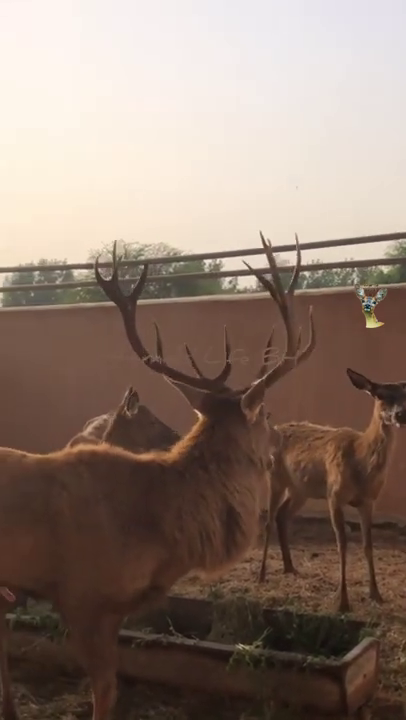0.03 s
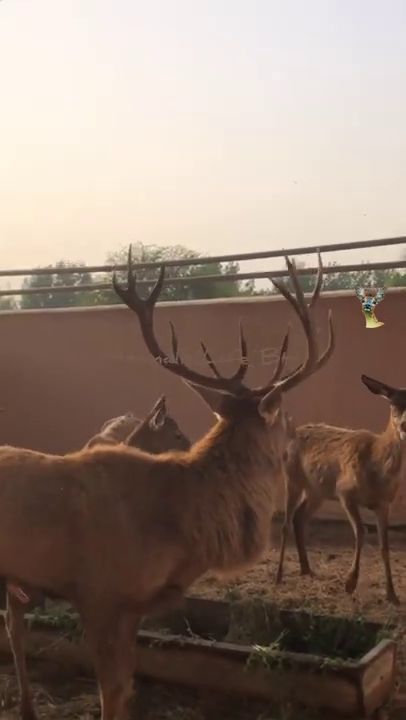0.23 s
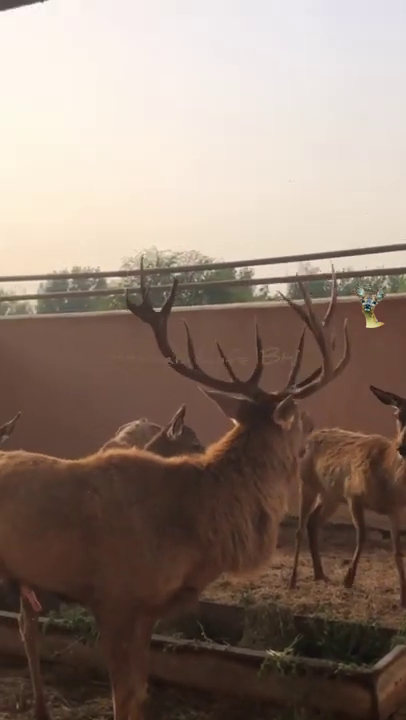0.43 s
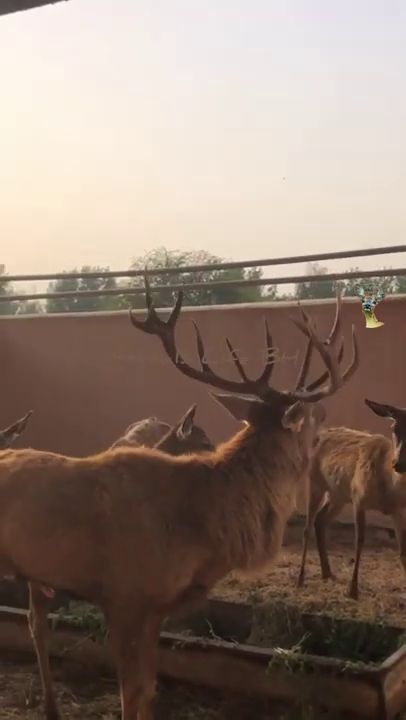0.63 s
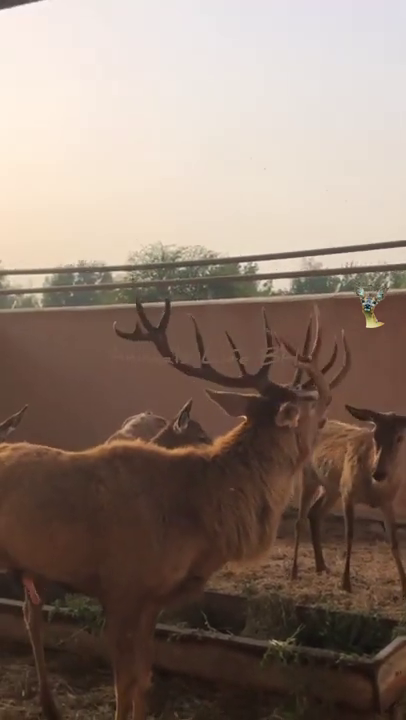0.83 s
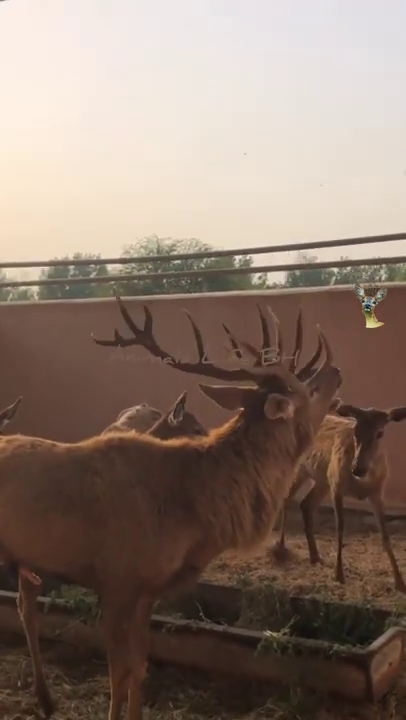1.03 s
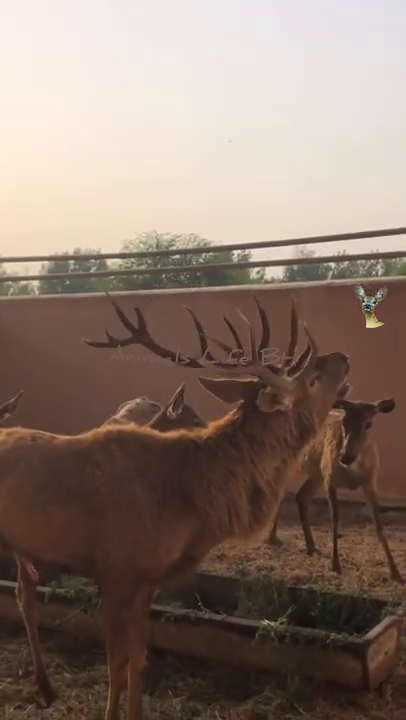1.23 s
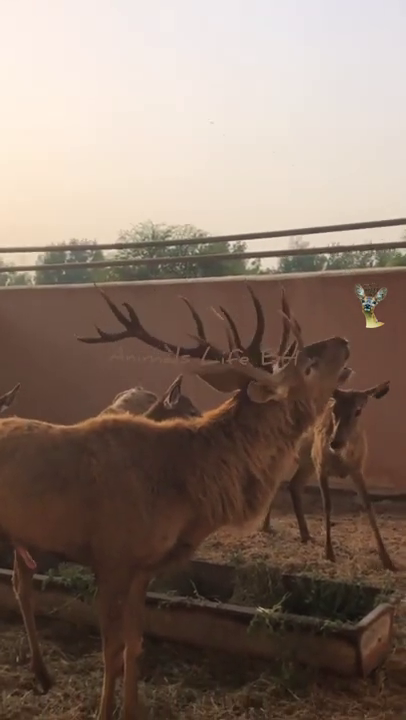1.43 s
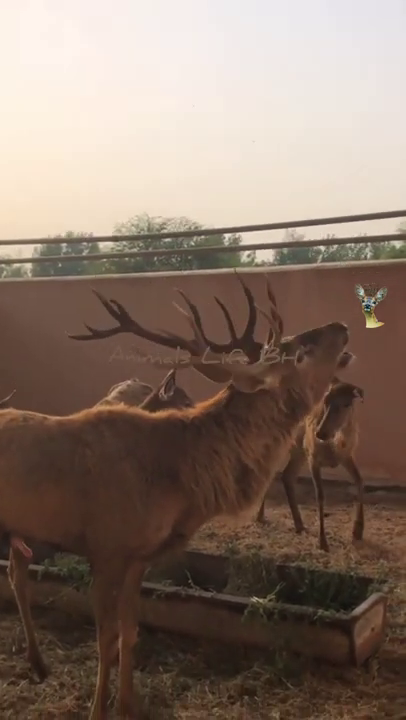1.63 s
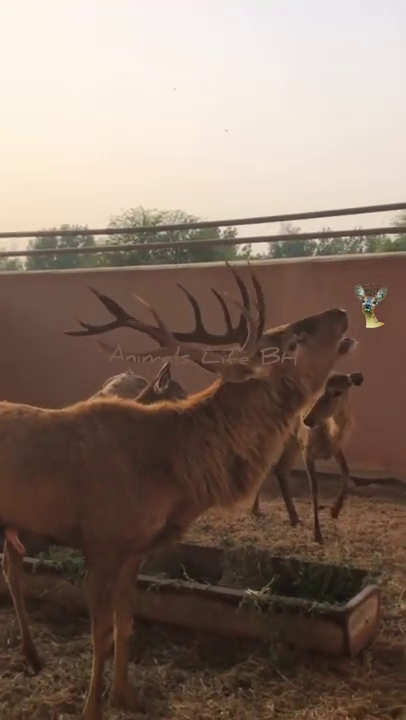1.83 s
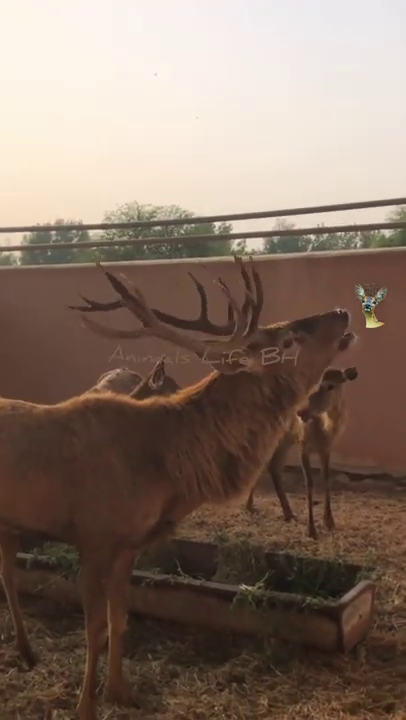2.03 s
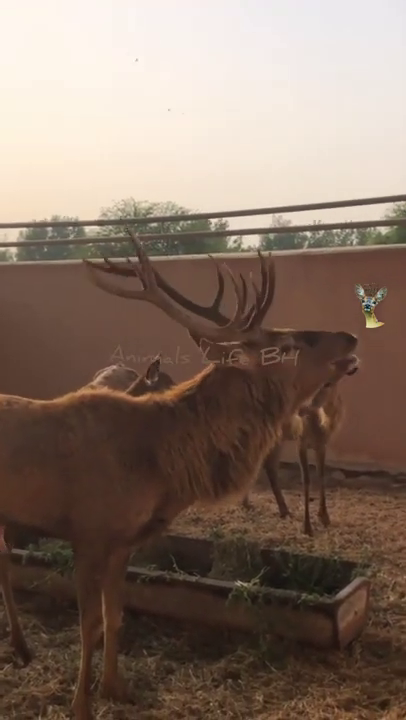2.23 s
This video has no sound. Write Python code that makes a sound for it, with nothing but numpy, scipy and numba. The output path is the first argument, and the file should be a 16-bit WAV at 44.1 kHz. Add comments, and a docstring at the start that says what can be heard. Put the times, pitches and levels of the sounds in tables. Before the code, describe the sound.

A red deer stag roars once, starting right away with a deep, rough tone and a faint breathy hiss. The roar swells, is loudest from about 1.1 to 1.7 seconds, then turns hoarse and drops in pitch, ending just after 2 seconds. The walls of the outdoor pen add a short echo, and a faint low rumble continues underneath.

```python
"""In a walled pen, over a low outdoor rumble, a red deer stag gives one long, deep roar.
His voice is a source and a filter: slow vocal-fold pulses excite the resonances of the throat, which
sink as he stretches his neck and lengthens it. The roar swells, then turns hoarse and drops in pitch.
Air hisses through his mouth, three faint ticks sound, and ground and walls reflect the roar."""
import sys
import numpy as np
from scipy import signal
from scipy.fft import rfft, irfft
from scipy.io import wavfile
from scipy.ndimage import uniform_filter1d
from numba import njit

SR = 44100
rng = np.random.default_rng(int(sys.argv[2]) if len(sys.argv) > 2 else 0)


def wav_record(signal):
    """Record a signal, one row per channel, as 16-bit PCM in the file named by sys.argv[1]."""
    frames = np.transpose(np.atleast_2d(signal))
    bounded = np.clip(frames, -1, 1)
    # unit amplitude maps onto the largest positive 16-bit level
    quanta = np.round(bounded * 32767).astype(np.int16)
    wavfile.write(sys.argv[1], SR, quanta)


N = 101429
TIME = np.arange(N) / SR


def from_db(db):
    """Amplitude ratio: tenfold for every 20 dB."""
    return 10 ** (np.asarray(db) / 20)


def rms_one(x):
    """Normalisation to unit mean power."""
    return x / np.sqrt(np.mean(x ** 2) + 1e-20)


def in_time(rows):
    """Linear interpolation of each column at every sample."""
    seconds, *columns = np.transpose(rows)
    return [np.interp(TIME, seconds, column) for column in columns]


def cut(x, hz, kind, order=2):
    """Butterworth low- or high-pass filtering."""
    return signal.sosfilt(signal.butter(order, hz, kind, fs=SR, output="sos"), x)


def wander(hz):
    """Slow random fluctuation: low-passed noise of unit rms."""
    return rms_one(cut(rng.standard_normal(N), hz, "low"))


def smoothed(x, seconds):
    """A moving average, taken twice."""
    size = int(seconds * SR)
    return uniform_filter1d(uniform_filter1d(x, size), size)


def evened(x):
    """Division by the running rms holds the level at 1 over a few pulses."""
    return x / np.sqrt(np.abs(smoothed(x * x, seconds=0.03)) + 1e-14)


def coloured(x, spectrum):
    """Spectral shaping by a curve over log frequency, scaled to unit rms."""
    hz, db = np.transpose(spectrum)
    bin_hz = np.maximum(np.arange(N // 2 + 1) * SR / N, 1)
    gain = from_db(np.interp(np.log(bin_hz), np.log(hz), db))
    return rms_one(irfft(rfft(x) * gain, N))


@njit
def resonate(x, hz, width_hz):
    """A driven, damped oscillator with a moving natural frequency and a peak gain of about 1."""
    out, state, decay = np.zeros(len(x)), 0j, np.exp(-np.pi * width_hz / SR)
    for i in range(len(x)):
        state = state * decay * np.exp(2j * np.pi * hz[i] / SR) + x[i]
        out[i] = 2 * (1 - decay) * state.real
    return out


# The outdoor noise spectrum. Each row: frequency in Hz, relative spectral density in dB.
RUMBLE_SPECTRUM = [(20, -25), (35, -8), (50, 10), (64, -6.5), (85, 0.5), (120, -9), (200, -16),
                   (400, -25.5), (700, -22.5), (1100, -25.5), (2500, -32), (5000, -39.5), (9000, -51),
                   (15000, -52.5)]

def outdoor_rumble():
    """Ambient noise: a random signal with most of its power at low frequencies."""
    return from_db(-36.5) * coloured(rng.standard_normal(N), RUMBLE_SPECTRUM)


# Faint ticks. Each row: start in seconds, level in dB, centre frequency in Hz.
TICKS = [(.105, -48, 7800), (0.173, -47.5, 5300), (2.045, -48, 6303)]

def ticks(decay_s=0.0064):
    """Transients: bright bursts of narrow-band noise that decay exponentially."""
    out = 0
    for start, db, hz in TICKS:
        band = resonate(rng.standard_normal(N), np.full(N, float(hz)), width_hz=440.0)
        envelope = (TIME >= start) * np.exp(-np.abs(TIME - start) / decay_s)
        out += from_db(db) * envelope * rms_one(cut(band, 4500, "high"))
    return out


def pen_reverberation(x, t60_s, build_s=0.027):
    """Reverberation: dense reflections between the walls merge into a decaying noise tail."""
    t = np.arange(SR) / SR
    tail = rng.standard_normal(SR) * from_db(-60 * t / t60_s) * np.clip(t / build_s, 0, 1)
    tail /= np.sqrt(np.sum(tail ** 2))
    return cut(signal.fftconvolve(x, tail)[:N], 4100, "low")


# Reflections from ground and walls. Each row: delay in seconds, gain in dB.
REFLECTIONS = [(.0031, -10.5), (.0076, -11.5), (0.0176, -3.5), (.0251, -11)]

def echoed(x):
    """Superposition: the direct sound interferes with its delayed, weaker reflections."""
    return x + sum(from_db(db) * np.interp(TIME - delay, TIME, x, left=0) for delay, db in REFLECTIONS)


# Air in the mouth. Each row: time in seconds, level in dB, centre frequency in Hz.
MOUTH_HISS = [(.05, -60, 8400), (.3, -56, 7340), (.45, -49, 7460), (.65, -48.5, 7100), (.85, -48, 6080),
              (1.03, -48.5, 6100), (1.15, -59.5, 6110), (1.6, -62.5, 6440), (2.0, -81, 7160)]

def mouth_hiss(puffs, pulsing=0.61):
    """Turbulence: a high band of noise, partly modulated in amplitude by the puffs of air."""
    db, hz = in_time(MOUTH_HISS)
    noise = (1 - pulsing + pulsing * puffs) * rng.standard_normal(N)
    band = resonate(cut(noise, 5000, "high", order=4), hz, width_hz=1500.0)
    return from_db(db) * rms_one(echoed(cut(band, 8900, "low", order=4)))


# The colour of the rasp. Each row: frequency in Hz, relative gain in dB.
RASP_SPECTRUM = [(2500, 0), (3300, 7.5), (4300, 1), (4900, -13), (6400, -14), (7600, -20.5), (8300, -8.5),
                 (8700, -18), (10500, -22.5), (11800, -18), (12600, -35), (15000, -32)]
# Its strength. Each row: time in seconds, level in dB relative to the upper resonances.
RASP_LEVEL = [(.2, -22), (.45, -16.5), (1.03, -26.5), (1.17, -17.5), (1.7, -20), (2.05, -26)]

def rasp(pulses, air):
    """Aspiration noise: pulsing air and a trace of the fold clicks reach above the resonances."""
    excitation = from_db(-27) * pulses + air
    return from_db(in_time(RASP_LEVEL)[0]) * evened(echoed(coloured(excitation, RASP_SPECTRUM)))


# The vibration rate of the folds. Each row: time in seconds, frequency in Hz.
FOLD_RATE = [(0.06, 82), (0.12, 91.22), (0.14, 93.64), (0.18, 97), (0.24, 93.44), (0.33, 82.9),
             (0.4, 82.81), (0.65, 82.61), (0.8, 78.38), (1.0, 82.8), (1.12, 90.28), (1.24, 87.42),
             (1.56, 89.21), (1.7, 88.5), (1.8, 83.95), (1.95, 69.33), (2.02, 64.66), (2.1, 62.57)]
# Their hoarseness. Each row: time in seconds, roughness from 0 to 1.
HOARSENESS = [(.05, 0.48), (.28, 0.38), (.38, 0.2), (.68, 0.12), (.78, 0.27), (.9, .15), (1.05, 0.24),
              (1.25, 0.21), (1.45, 0.11), (1.64, 0.14), (1.74, 0.49), (2.05, 0.7)]

def fold_motion(wobble_cycles=0.038, wobble_hz=25.4):
    """Phase is the integral of frequency; hoarseness adds a random wobble to the count of cycles."""
    pitch, rough = in_time(FOLD_RATE)[0], in_time(HOARSENESS)[0]
    cycles = np.cumsum(pitch) / SR + wobble_cycles * rough ** 2 * wander(wobble_hz)
    return pitch, rough, np.maximum.accumulate(cycles)


def fold_pulses(cycles, rough, scatter, jitter_s, shimmer_db=1.5):
    """Jitter and shimmer: each closure is a click whose time and strength scatter with hoarseness."""
    closures = np.interp(np.arange(1, int(cycles[-1])), cycles, np.arange(N))
    timing, strength = rough[closures.astype(int)] * scatter[:len(closures)].T
    closures = np.clip(closures + jitter_s * SR * timing, 0, N - 2)
    size = from_db(shimmer_db * strength)
    out, whole, fraction = np.zeros(N), closures.astype(int), closures % 1
    out[whole] += size * (1 - fraction)
    out[whole + 1] += size * fraction
    return rms_one(out)


# The lengthening throat. Each row: time in seconds, stretch (0 short, 1 half stretched, 2 long).
THROAT_STRETCH = [(.1, 1.09), (.27, 0.85), (.36, 0.4), (.55, 0.4), (.7, 0.75), (.87, 0.86), (1.03, 1.21),
                  (1.25, 1.793), (1.45, 1.905), (1.6, 1.87), (2.0, 2.03)]

def by_stretch(values):
    """Interpolation between the short, half stretched and long throat as the neck moves."""
    return np.interp(in_time(THROAT_STRETCH)[0], np.arange(3), values)


def throat(source, formants, skirt_ratio=4.72):
    """Formants: parallel resonances of the throat's air column, most sinking as it lengthens."""
    out = 0
    for row in formants:
        hz, db, width_hz = by_stretch(row[:3]), by_stretch(row[3:6]), float(row[6])
        peak = resonate(source, hz, width_hz)
        out += from_db(db) * resonate(peak, hz, width_hz * skirt_ratio)  # steepens the flanks
    return out


# The upper throat resonances. Each row: three frequencies in Hz (short, half stretched and long
# throat), three relative gains in dB for the same, bandwidth in Hz.
UPPER_FORMANTS = [(1226, 950, 890, -1.5, -3, 1, 29.4), (1252, 1135, 1130, 1.5, -5, -1, 44.7),
                  (1679, 1425, 1240, -2, -6.5, -3, 16.7), (2114, 1700, 1625, 4.5, -15, -9, 101),
                  (2350, 1990, 1890, -0.5, -5, -9.5, 55), (3090, 2400, 2230, -4.5, -13, -14.5, 48),
                  (3047, 2726, 2800, -0.5, -18.5, -18.5, 70), (3348, 3270, 3050, -13, -21.5, -14, 29)]

def upper_resonances(pulses, air):
    """Impulse response: each fold click rings in the upper formants, along with the noise of air."""
    voiced = throat(pulses + from_db(5.5) * air, UPPER_FORMANTS)
    voiced = cut(voiced, 3610, "low", order=8)
    return evened(echoed(cut(voiced, 842, "high", order=4)))


# The low throat resonances. Each row: three frequencies in Hz (short, half stretched and long
# throat), three relative gains in dB for the same, bandwidth in Hz.
GROWL_FORMANTS = [(242, 258, 156, 1, -11, 3, 72), (353, 329, 350, 2.5, -4, 13.5, 31),
                  (575, 570, 650, -12, -14.5, -14.5, 105)]

def growl(pulses, air):
    """Forced vibration: uneven pulses and a little air drive the low formants."""
    voiced = throat(pulses + from_db(-14) * air, GROWL_FORMANTS)
    voiced = cut(voiced, 675, "low", order=4)
    return evened(cut(voiced, 102, "high"))


# The throat's response to the lowest harmonics. Each row: frequency in Hz, then relative gain in dB
# for the short, half stretched and long throat.
DEEP_RESPONSE = [(70.4, -12, -7, -2), (94, -11.5, -8.5, -20), (135, -14, -12, -8), (160, -12.5, -12, -10.5),
                 (240, -3.5, -10, -9.5), (333, -6.5, 0, 0.5), (362.2, -7, 4.5, 0.5), (408.4, -4, -18, -28),
                 (431, -14, -19.5, -19.5), (521, -3.5, -16, -15), (519.2, -12.5, -24, 2),
                 (602, -5.5, -17, -31.5), (684, 3.5, -38, -24), (780, -19, -29.5, -44)]

def deep_tone(cycles, pitch, flutter_db=1, dispersion_rad=0.8):
    """Fourier synthesis: ten clean harmonics, each weighted by the throat at its frequency."""
    hz, *responses = np.transpose(DEEP_RESPONSE)
    weights, out = [by_stretch(w) for w in np.eye(3)], 0
    for k in range(1, 11):
        db = sum(w * np.interp(k * pitch, hz, response) for w, response in zip(weights, responses))
        amplitude = from_db(db + flutter_db * wander(hz=15))
        out += amplitude * np.cos(2 * np.pi * k * cycles - dispersion_rad * k * k)
    return evened(cut(out, 100, "high"))


# Harmonics that ring out. Each row: time of the peak in seconds, length in seconds, harmonic number,
# level in dB.
RINGING_HARMONICS = [(.4, 0.16, 26, -37.5), (0.424, 0.16, 16, -38.5), (.42, .12, 28, -39),
                     (0.558, 0.2, 14, -36), (0.606, 0.085, 27, -38), (.6, 0.062, 34, -36),
                     (0.703, .11, 18, -28.5), (0.711, .11, 12, -31.5), (.72, 0.11, 40, -41),
                     (0.806, .09, 5, -30), (0.817, 0.055, 26, -36), (0.879, 0.17, 12, -30),
                     (0.972, 0.075, 7, -34.5), (1.025, .07, 11, -30.5), (1.124, .12, 22, -34),
                     (1.256, 0.11, 13, -29), (1.271, 0.13, 11, -34.5), (1.263, 0.088, 7, -36),
                     (1.35, .26, 19, -27.5), (1.387, 0.089, 14, -25.5), (1.586, 0.12, 21, -33.5),
                     (1.586, 0.11, 34, -40.5), (1.603, 0.14, 10, -24.5), (1.612, 0.068, 13, -31),
                     (1.788, 0.11, 2, -33)]

def ringing(cycles, voice, flutter_db=1.4):
    """Resonant reinforcement: at the listed times single harmonics swell, in phase with the voice."""
    out = 0
    for peak_s, length_s, k, db in RINGING_HARMONICS:
        carrier = np.exp(2j * np.pi * k * cycles)
        phasor = smoothed(voice / carrier, seconds=0.06)  # demodulation gives the harmonic's phase
        partial = np.sqrt(2) * (carrier * phasor).real / (np.abs(phasor) + 1e-12)
        swell = np.exp(-np.abs(2 * (TIME - peak_s) / length_s) ** 3)
        out += from_db(db + flutter_db * wander(hz=25.4)) * swell * partial
    return out


# The effort of the roar. Each row: time in seconds, level of the low resonances in dB, level of the
# upper resonances in dB.
ROAR_LEVELS = [(0.03,-55,-53), (0.09,-30.5,-49.5), (0.17,-31,-41.5), (0.31,-26.5,-36.5), (0.38,-30,-30.5),
               (0.6,-24.5,-30.5), (0.7,-25.5,-30.5), (0.78,-27,-31), (0.9,-24.5,-27.5), (0.98,-21.5,-29),
               (1.04,-18.5,-23.5), (1.13,-16,-23.5), (1.26,-18.5,-22), (1.42,-15.5,-22), (1.48,-14.5,-25),
               (1.6,-16.5,-25.5), (1.7,-16.5,-22), (1.83,-21.5,-22), (2.02,-24.5,-31.5), (2.15,-45,-41)]

def stag_roar(jitter_s=0.00024, puff_sharpness=0.63):
    """Source and filter: folds and breath drive the throat, giving a deep tone and a bright rattle."""
    low_gain, high_gain = from_db(in_time(ROAR_LEVELS))
    scatter = rng.standard_normal((400, 2))  # time and strength of each closure, common to all bands
    pitch, rough, cycles = fold_motion()
    pulses = fold_pulses(cycles, rough, scatter, jitter_s)
    steadier_pulses = fold_pulses(cycles, rough, scatter, 0.57 * jitter_s)
    puffs = rms_one(np.exp(puff_sharpness * np.cos(2 * np.pi * cycles)))
    air = rough * puffs * rng.standard_normal(N)
    growl_share = 0.65 * rough
    blend = (1 - growl_share) * deep_tone(cycles, pitch) + growl_share * growl(steadier_pulses, air)
    low = low_gain * evened(blend)
    high = high_gain * upper_resonances(pulses, air)
    rattle = high + high_gain * rasp(pulses, air) + mouth_hiss(puffs)
    tone = low + ringing(cycles, low + high)
    onset_s, end_s, release_s = 0.01, 2.044, 0.035
    envelope = np.clip(TIME / onset_s, 0, 1) * np.exp(-np.maximum(TIME - end_s, 0) / release_s)
    return envelope * tone, envelope * rattle


def scene():
    """Superposition of the roar, its reverberation, the ticks and the rumble, in one channel."""
    tone, rattle = stag_roar()
    tone_tail = from_db(-14) * pen_reverberation(tone, t60_s=0.85)
    rattle_tail = from_db(-5) * cut(pen_reverberation(rattle, t60_s=0.54), 650, "high")
    return (tone + rattle + tone_tail + rattle_tail + ticks() + outdoor_rumble())[None]


def record(dry):
    """Band limiting: a steep low-pass removes the highest treble."""
    stop_db, stop_hz = 70, 16380
    return signal.sosfilt(signal.cheby2(12, stop_db, stop_hz, fs=SR, output="sos"), dry)


dry = scene()
out = record(dry)
wav_record(out)
```